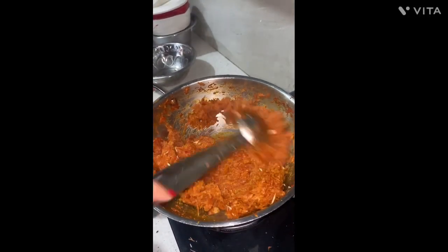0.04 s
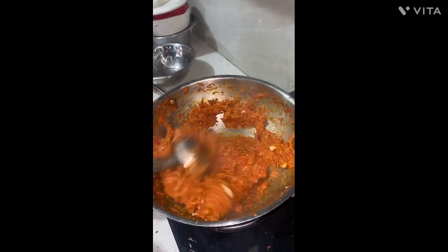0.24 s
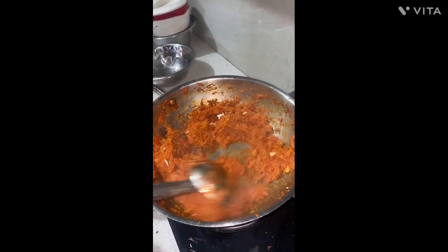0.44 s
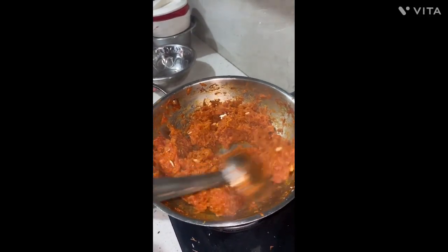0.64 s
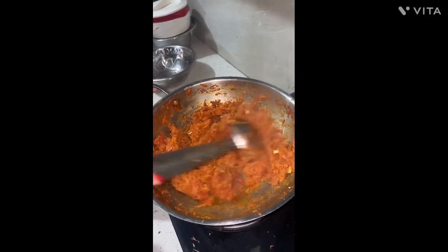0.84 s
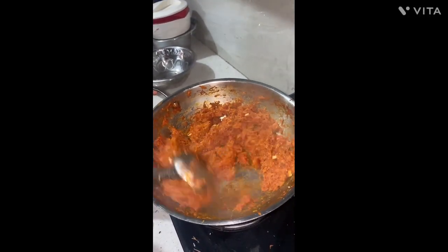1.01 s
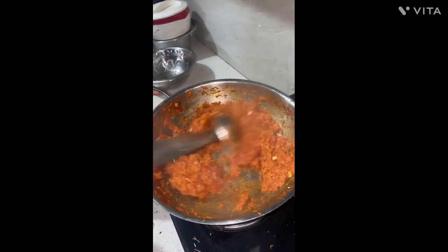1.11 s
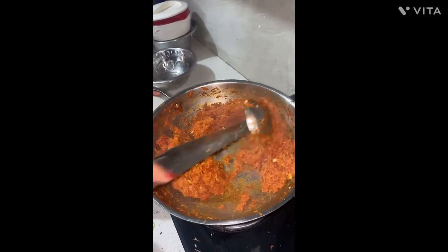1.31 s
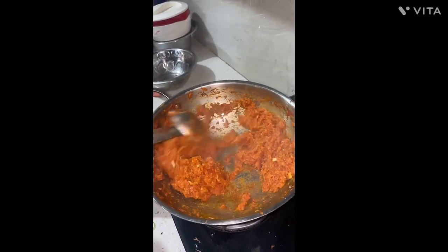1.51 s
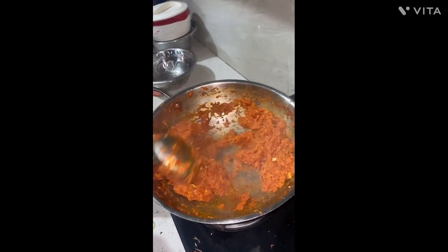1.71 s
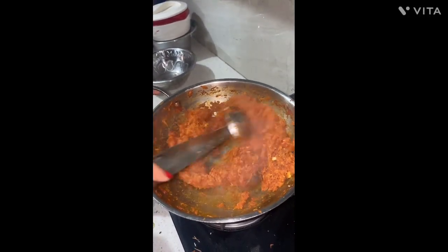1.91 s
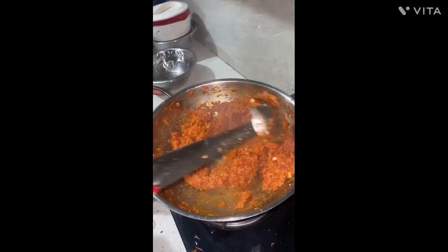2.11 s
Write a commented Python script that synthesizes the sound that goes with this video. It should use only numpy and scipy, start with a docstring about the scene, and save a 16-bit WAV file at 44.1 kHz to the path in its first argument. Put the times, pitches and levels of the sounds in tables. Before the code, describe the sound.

A metal ladle scrapes and knocks in a steel pan, stirring thick food.

```python
"""Stirring a steel pan

A steel ladle works through thick, sweet food on a kitchen hob, heard close by. It knocks on the pan,
scrapes and squeaks over bare steel and judders dully through the food, which damps the ringing.
Underneath, bursting bubbles sizzle faintly and the room and the rocking pan rumble."""
import sys
import numpy as np
from scipy import signal
from scipy.fft import rfft, irfft
from scipy.io import wavfile
from scipy.ndimage import uniform_filter1d

SR = 44100
rng = np.random.default_rng(int(sys.argv[2]) if len(sys.argv) > 2 else 0)


def persist_wave(psi):
    """Save psi, clipped to +-1, as 16-bit WAV."""
    counts = np.round(np.clip(psi, -1, 1) * 32767).astype(np.int16)
    wavfile.write(sys.argv[1], SR, np.atleast_2d(counts).T)


N = 94815
TIME = np.arange(N) / SR


def amp(db):
    """Decibels to gain."""
    return 10 ** (np.asarray(db) / 20)


def unit(x):
    """Scales to rms 1."""
    return x / np.sqrt(np.mean(x ** 2) + 1e-20)


def decay(t, t60):
    """A ring-out that falls 60 dB in t60 seconds."""
    return np.exp(-np.log(1000) * t / t60)


def read(points, hz):
    """Reads a table on a log-frequency axis."""
    freqs, values = np.transpose(points)
    return np.interp(np.log(hz + 1), np.log(freqs), values)


def envelope(strokes):
    """Summed gain of the strokes, each silent outside its own span."""
    curves = map(np.transpose, strokes)
    return sum(amp(np.interp(TIME, s, db)) * (TIME >= s[0]) * (TIME <= s[-1]) for s, db in curves)


def wander(per_s):
    """A random curve that takes a new value per_s times a second."""
    return np.interp(TIME * per_s, np.arange(N), rng.standard_normal(N))


def grains(per_s, spread_db):
    """Random tiny impacts of uneven size."""
    size = amp(spread_db * np.minimum(rng.exponential(1, N), 4))
    return unit(size * rng.choice([-1, 1], N) * (rng.random(N) < per_s / SR))


def add(mix, start_s, sound):
    """Mixes a stereo sound in at start_s."""
    part = mix[:, max(round(start_s * SR), 0):][:, :sound.shape[1]]
    part += sound[:, :part.shape[1]]


def convolve(x, response):
    """Convolves each channel, keeping the length of x."""
    x = np.atleast_2d(x)
    return signal.fftconvolve(x, np.atleast_2d(response), axes=1)[:, :x.shape[1]]


def colour(x, eq, flatten=False, size=8192):
    """Minimum-phase EQ; can first even out the broad ripple of x."""
    log_gain = np.log(amp(read(eq, abs(np.fft.fftfreq(size, 1 / SR)))))
    if flatten:
        power = uniform_filter1d(abs(np.fft.fft(x, size)) ** 2, size=31, mode="wrap")
        log_gain = log_gain - .5 * np.log(power)
    spectrum = np.exp(np.conj(signal.hilbert(log_gain)))
    return convolve(x, np.fft.ifft(spectrum).real[..., :size // 2])


def resonate(x, hz, width_hz):
    """A resonance that follows the curve hz."""
    turn = np.exp(2j * np.pi * np.cumsum(hz) / SR)
    pole = np.exp(-np.pi * width_hz / SR)
    return (turn * signal.lfilter([(1 - pole) ** 2], np.poly([pole, pole]), x / turn)).real


# Stereo timing. Each row: frequency in Hz, lag of the left side in seconds.
LEFT_LAG = [(100, 0.00021), (700, 0.00013), (1300, 0.00011), (2000, .00018), (16000, 0.0001865)]
# How alike the sides are. Each row: frequency in Hz, likeness from 0 to 1.
LIKENESS = [(100, 0.83), (400, .95), (900, 0.7), (1400, .55), (2000, 0.2), (4000, 0.13), (6800, 0.39),
            (8200, 1), (11000, 0.83), (13500, 1), (16000, 0.43)]
# Stereo lean. Each row: frequency in Hz, left minus right in dB.
BALANCE = [(60, -3.5), (170, 1), (290, -5.5), (520, 6.5), (780, -1.5), (1200, 0.5), (1800, -3), (2900, 3),
           (4000, 3.5), (6000, -1.5), (15000, 1)]


def stereo(pair):
    """Blends, delays and tilts two signals into one stereo image."""
    size = 2 * pair.shape[1]
    shared, side = rfft(pair, size)
    hz = np.fft.rfftfreq(size, 1 / SR)
    same = np.clip(read(LIKENESS, hz), 0, 1)
    lean = amp(read(BALANCE, hz) / 2)
    delay = np.exp(-2j * np.pi * hz * read(LEFT_LAG, hz))
    left = (same * shared + np.sqrt(1 - same ** 2) * side) * delay
    return irfft(np.array([left * lean, shared / lean]), size)[:, :size // 2]


# The kitchen's room tone. Each row: frequency in Hz, gain in dB.
ROOM_EQ = [(20, -25), (40, 0), (70, 5.5), (120, -10), (160, 10.5), (210, -20), (290, 8), (380, -31),
           (700, -29), (1200, -22), (4000, -48)]
# The low body of the rocking pan. Each row: frequency in Hz, gain in dB.
ROCKING_EQ = [(25, -38), (50, -2), (70, -2), (95, -0.5), (150, -11), (220, -8), (400, -27)]
# Swells of the rocking. Each row: time in seconds, relative level in dB.
ROCKING_SWELLS = [(0.0, -39.5), (0.17, -51), (0.21, -33), (0.4, -46.5), (0.67, -34.5), (0.98, -44.5),
                  (1.01, -50), (1.37, -47), (1.42, -39), (1.81, -62.5), (1.83, -38), (2.15, -48.5)]


def rumble(room_db=-59, rocking_trim_db=-3):
    """Steady kitchen rumble, and the pan rocking on the hob."""
    room = unit(stereo(colour(rng.standard_normal((2, N)), ROOM_EQ)))
    rocking = unit(stereo(colour(rng.standard_normal((2, N)), ROCKING_EQ)))
    swell_db = np.interp(TIME, *np.transpose(ROCKING_SWELLS))
    return amp(room_db) * room + amp(rocking_trim_db + swell_db) * rocking


# The tone of the bubbles. Each row: frequency in Hz, gain in dB.
SIZZLE_EQ = [(300, -2), (700, -4), (1050, -8), (1800, -6), (2500, -11), (3300, -4), (5500, -9),
             (7500, -4.5), (9800, 1), (12000, -1.5), (14300, -12), (16000, -4.5)]
# The sizzle's slow rise and fall. Each row: time in seconds, level in dB.
SIZZLE_LEVEL = [(0, -41), (.45, -40), (.95, -36), (1.3, -43), (1.65, -42.5), (2.15, -41)]


def sizzle():
    """Countless tiny bubbles burst in the hot food; a few larger ones spit."""
    pops = [grains(per_s=4000, spread_db=1) + amp(-8) * grains(per_s=70, spread_db=2.5) for _ in range(2)]
    gain = amp(np.interp(TIME, *np.transpose(SIZZLE_LEVEL)))
    return gain * unit(stereo(colour(pops, SIZZLE_EQ)))


# The kitchen's reverb. Each row: frequency in Hz, T60 in seconds.
ROOM_DECAY = [(200, 0.42), (600, 0.33), (1400, 0.22), (3700, 0.21), (10000, 0.088)]
# The pan's dense, quickly damped ring. Each row: frequency in Hz, gain in dB.
PAN_EQ = [(40, -7), (90, 4), (190, -22.5), (290, 2.5), (390, 1), (600, 2.5), (790, 5), (980, -6),
          (1220, 0.5), (1500, -3.5), (1850, 0), (2120, -3), (2450, -11), (2850, 3), (3250, -1), (4300, -7),
          (5300, -4.5), (6600, -5.5), (8200, 2), (9200, -4), (10900, 2), (12500, -4), (13800, -11.5),
          (14600, -40), (16000, -3)]
# Clear ringing steel notes of pan and ladle. Each row: pitch in Hz, relative level in dB, T60 in seconds.
STEEL_MODES = [(290, -42.5, .19), (314, -46, .13), (444, -59, .16), (600, -44, .07), (772, -46, .1),
               (1205, -52.5, .2), (1750, -51, .1), (1840, -42, .07), (2880, -47, .11), (3074, -55, .35),
               (3182, -42, .19), (3370, -47, .15), (4650, -54, .08), (5146, -47, .11), (5448, -54, .2),
               (6837, -51, .16), (10380, -44, .05), (10860, -42, .05)]


def pan_response(size=12288, dense_db=3.5, tail_db=-7):
    """One tap: a click, dense damped ringing, clear notes of pan and ladle, and the kitchen's tail."""
    t = np.arange(size) / SR
    dense = unit(rng.standard_normal((2, size)) * decay(t, t60=0.024))
    band_hz, frame_s, noise = signal.stft(rng.standard_normal((2, size)), SR, nperseg=256)
    fading = noise * decay(frame_s, read(ROOM_DECAY, band_hz)[:, None])
    tail = unit(signal.istft(fading)[1][:, :size])
    tap = (amp(dense_db) * dense + amp(tail_db) * tail) / np.sqrt(size)
    tap[0, 0] += 1  # the click
    tap = colour(tap, PAN_EQ, flatten=True)
    for hz, db, t60 in STEEL_MODES:
        tap[0] += amp(db) * decay(t, t60) * np.sin(2 * np.pi * hz * t)
    return stereo(tap)


def rub(spots, impacts, eq, strokes):
    """Small impacts follow the strokes, scattered over several spots of the pan."""
    force = impacts * envelope(strokes)
    where = rng.integers(0, len(spots), N)
    rings = [unit(colour(spot, eq)) / np.sqrt(spot.shape[1]) for spot in spots]
    return sum(convolve(force * (where == k), ring) for k, ring in enumerate(rings))


# Pushes through the food, one list each. Each row: time in seconds, relative level in dB.
PUSHES = [
    [(0.0, -32), (0.026, -41), (0.076, -48), (0.092, -47), (0.122, -38.5), (0.138, -46), (0.152, -39),
     (0.17, -57)],
    [(0.33, -51), (0.364, -42), (0.376, -42), (0.41, -51)],
    [(0.42, -53.5), (0.45, -28), (0.482, -52), (0.508, -26.5), (0.536, -37.5), (0.602, -36), (0.612, -21),
     (0.645, -17.5), (0.73, -40.5)],
    [(0.735, -27), (0.745, -58), (0.759, -19.5), (0.857, -45.5), (0.903, -27.5), (0.93, -84)],
    [(0.98, -45), (1.028, -28.5), (1.142, -37.5), (1.154, -74), (1.17, -30.5), (1.198, -37.5), (1.23, -48),
     (1.26, -72), (1.27, -57)],
    [(1.35, -47), (1.382, -32), (1.402, -38), (1.414, -26), (1.472, -38), (1.506, -32), (1.52, -62),
     (1.526, -48), (1.56, -60)],
]
# The dull force of the bumps. Each row: frequency in Hz, gain in dB.
BUMP_EQ = [(50, -14.5), (150, -6.5), (300, -5.5), (550, -9.5), (900, -9), (1400, -17), (2500, -22.5),
           (6000, -34), (16000, -30)]
# The bright force of the wet crackles. Each row: frequency in Hz, gain in dB.
CRACKLE_EQ = [(200, -53), (1000, -10), (2500, 4), (6000, 2.5), (9000, -1), (16000, -21)]


def pushing(spots, bump_db=-5, crackle_db=-16):
    """Cushioned by food, the ladle bumps softly along the bottom while the wet mass crackles."""
    bumps = rub(spots, grains(per_s=660, spread_db=3.5), BUMP_EQ, PUSHES)
    crackles = rub(spots, grains(per_s=160, spread_db=0.5), CRACKLE_EQ, PUSHES)
    return amp(bump_db) * bumps + amp(crackle_db) * crackles


# Treble hiss on bare steel, one list a stroke. Each row: time in seconds, relative level in dB.
HISS_STROKES = [
    [(0.235, -43), (0.253, -25), (0.277, -29.5), (0.317, -26), (0.4, -44.5)],
    [(0.5, -52), (0.512, -55), (0.55, -34.5), (0.582, -39.5), (0.594, -30), (0.612, -44), (0.634, -54),
     (0.642, -42), (0.7, -45)],
    [(0.735, -53), (0.753, -38), (0.769, -41), (0.812, -27), (0.826, -25), (0.833, -14), (0.843, -23),
     (0.861, -34), (0.877, -29), (0.899, -60), (0.91, -55)],
    [(0.99, -51), (1.042, -41), (1.056, -21.5), (1.104, -27.5), (1.12, -48), (1.14, -52)],
]
# The force behind the hiss. Each row: frequency in Hz, gain in dB.
HISS_EQ = [(100, -55), (700, -34), (2000, -11.5), (3300, -17.5), (5000, -2.5), (7000, -3.5), (11000, -3),
           (13000, -2.5), (16000, -10.5)]
# Midrange rasp, one list a stroke. Each row: time in seconds, relative level in dB.
RASP_STROKES = [
    [(0.235, -34), (0.251, -29), (0.275, -32), (0.291, -23), (0.309, -42), (0.323, -32), (0.4, -54)],
    [(0.5, -37), (0.538, -38), (0.554, -29), (0.59, -40), (0.612, -38), (0.65, -39), (0.676, -45),
     (0.7, -51)],
    [(0.735, -40), (0.743, -32), (0.812, -24), (0.833, -22), (0.848, -33), (0.91, -55)],
    [(0.99, -50), (1.002, -42), (1.02, -36), (1.04, -44), (1.055, -24), (1.098, -26.5), (1.122, -58),
     (1.162, -62), (1.22, -50)],
]
# The force behind the rasp. Each row: frequency in Hz, gain in dB.
RASP_EQ = [(100, -31), (400, -22), (750, -3), (1000, -9.5), (1250, 2), (1800, 7), (2350, -2.5), (3100, 0),
           (4000, 3), (5500, -1), (9000, -13), (16000, -48)]
SLIPS_PER_S, SLIP_SPREAD_DB = 6000, 3.5


def scraping(spots, hiss_db=2.15, rasp_db=0.5, judder_db=4):
    """Steel slips on steel thousands of times a second, in juddering clumps: hiss over rasp."""
    slips = grains(SLIPS_PER_S, SLIP_SPREAD_DB)
    clumps = unit(slips * amp(judder_db * wander(per_s=168.3)))
    hiss = rub(spots, clumps, HISS_EQ, HISS_STROKES)
    rasp = rub(spots, clumps, RASP_EQ, RASP_STROKES)
    return amp(hiss_db) * hiss + amp(rasp_db) * rasp


# The notes of the ladle's bowl. Each row: pitch in Hz, relative level in dB.
BOWL_MODES = [(1800, 0), (3200, -4), (4900, -11), (7400, -10)]


def ladle_bowl(trim_db=-6, bend_depth=.05):
    """Scraping rings the ladle's bowl; its pitch wanders as the contact point moves."""
    slips = np.array([grains(SLIPS_PER_S, SLIP_SPREAD_DB) for _ in range(2)])
    bend = 1 + bend_depth * wander(per_s=40)
    ring = sum(amp(db) * unit(resonate(slips, hz * bend, width_hz=60)) for hz, db in BOWL_MODES)
    return amp(trim_db) * stereo(unit(ring) * envelope(RASP_STROKES))


# Squeaks and groans. Each row: start and length in seconds, first and last pitch in Hz, level in dB.
SQUEAKS = [(.243,.026,5120,4960,-36), (0.275,0.032,1880,1800,-30.5), (.283,.02,3100,3080,-31),
           (.309,.04,1790,1700,-37), (.312,.026,1230,1270,-39), (0.342,0.031,800,756,-36),
           (.345,.028,2940,3080,-39), (0.532,0.031,3790,3460,-36.5), (0.546,.04,2970,2954,-38),
           (0.547,0.022,1750,1760,-38), (0.631,.04,609,513,-31.5), (.821,0.024,1898,1770,-20),
           (.765,.035,1900,1780,-33), (.826,.018,11300,11100,-21), (.826,0.062,3270,3160,-28),
           (.843,.028,1760,1700,-36), (1.051,0.028,3850,3880,-28), (1.054,0.032,801,758,-32),
           (1.054,.03,10400,10600,-29), (1.075,0.025,2800,2960,-26.5), (1.084,0.028,3400,3230,-30.5),
           (1.088,.03,1960,1880,-35), (1.411,.026,960,820,-35)]


def squeaks(half_width_hz=55):
    """The ladle's edge catches and sings briefly in a rough, gliding resonance."""
    out = np.zeros((2, N))
    pole = np.exp(-2 * np.pi * half_width_hz / SR)
    for start_s, length_s, first_hz, last_hz, db in SQUEAKS:
        progress = np.arange(0, 1, 1 / (length_s * SR))
        noise = rng.standard_normal((2, SR // 4, 2)) @ [1, 1j]
        grip = signal.lfilter([1], np.poly([pole, pole]), noise)[:, -len(progress):]
        cycles = np.cumsum(first_hz + (last_hz - first_hz) * progress) / SR
        tone = (grip * np.exp(2j * np.pi * cycles)).real
        add(out, start_s, amp(db) * unit(tone * np.sin(np.pi * progress)))
    return stereo(out)


# A knock's five bands, thud to tick. Each row: low and high edge in Hz, lag in seconds.
KNOCK_BANDS = [(255, 345, .004), (518, 985, 0.0012), (1114, 2245, 0), (2800, 3450, 0), (3700, 14500, 0)]
# Ladle knocks. Each row: start in seconds, then thud, clonk, clank, ring and tick levels in dB.
KNOCKS = [(.0215,-52,-65,-47,-46,-40), (.0435,-74,-50,-47,-52,-35), (.119,-56,-49,-46.5,-62,-70),
          (.199,-46,-40,-40,-50,-45), (.2165,-21.5,-23.5,-15,-30,-22.5), (.25,-69,-44,-51,-40,-27),
          (.2875,-35,-61,-33,-38,-32), (.434,-42,-40,-44,-56,-50), (.501,-36,-41,-42,-55,-49),
          (.608,-27,-37,-57,-48,-42), (.638,-30,-33.5,-48,-50,-40), (.742,-29,-32,-32,-40,-38),
          (.8095,-42,-38,-33,-29,-24), (.8292,-50,-42,-28,-27,-19), (.8435,-50,-48,-40,-36,-25),
          (.89,-33,-46,-54,-62,-66), (.9185,-56,-66,-53,-54,-34), (1.0,-38,-39,-37,-50,-56),
          (1.015,-32,-43,-37,-50,-50), (1.054,-35,-42,-36,-33,-28), (1.093,-37,-40,-30,-38,-27),
          (1.206,-35,-41,-46,-54,-45), (1.381,-41,-36,-39,-46,-38), (1.414,-37,-34,-47,-56,-44),
          (1.474,-39,-54,-43,-48,-44), (1.493,-32.5,-55,-45,-52,-47), (1.72,-49,-39.5,-48,-66,-55),
          (1.765,-77,-67,-66,-60,-43), (1.8298,-18.5,-20.5,-23,-23.5,-19), (1.8385,-40,-28,-47,-26,-21),
          (1.8495,-44,-60,-32,-30,-25), (2.022,-39,-41.5,-46,-52,-58)]


def knocks(spots, cushion_s_per_db=.0003, bare_db=9):
    """The ladle strikes the pan's spots in turn; food softens the attack of the dull knocks."""
    out = np.zeros((2, N))
    t = np.arange(1, spots.shape[-1] + 1) / SR
    for band, (low_hz, high_hz, lag_s) in enumerate(KNOCK_BANDS):
        bandpass = signal.butter(2, [low_hz, high_hz], "bandpass", fs=SR, output="sos")
        rings = signal.sosfilt(bandpass, spots)
        for i, (start_s, *band_db) in enumerate(KNOCKS):
            dullness_db = max(band_db) - band_db[-1]  # how far the tick lies under the loudest band
            attack_s = max(cushion_s_per_db * (dullness_db - bare_db), 1 / SR)
            ring = rings[i % len(spots)] * np.minimum(t / attack_s, 1)
            onset_rms = np.sqrt(np.mean(ring[:, :882] ** 2))  # first 20 ms
            add(out, start_s + lag_s, amp(band_db[band]) * ring / onset_rms)
    return out


def scene():
    """The ladle plays one pan at four spots, over the sizzle and rumble."""
    spots = np.array([pan_response() for _ in range(4)])
    stirring = knocks(spots) + scraping(spots[:2]) + pushing(spots[2:]) + ladle_bowl() + squeaks()
    return stirring + sizzle() + rumble()


def record(dry):
    """Rounds off the highest peaks, then cuts the very top of the treble."""
    ceiling, cutoff_hz = .8, 15850
    rounded = dry / (1 + (dry / ceiling) ** 4) ** .25
    lowpass = signal.firwin(511, cutoff_hz, window=("kaiser", 9), fs=SR)
    return signal.oaconvolve(rounded, lowpass[None], "same")


dry = scene()
out = record(dry)
persist_wave(out)
```